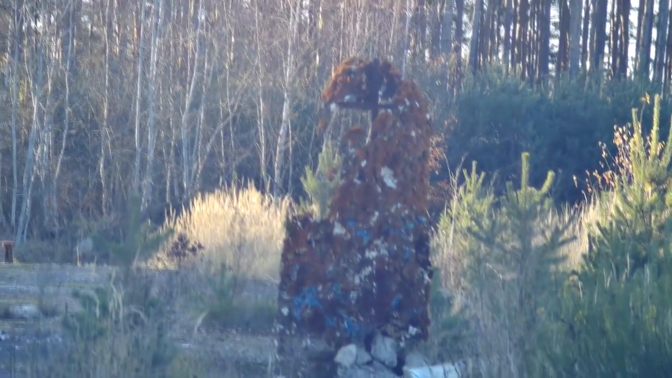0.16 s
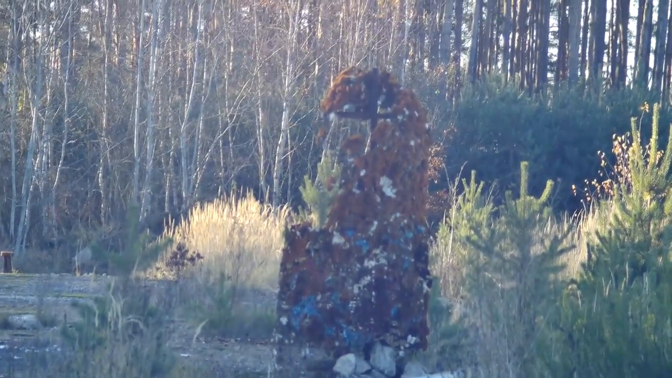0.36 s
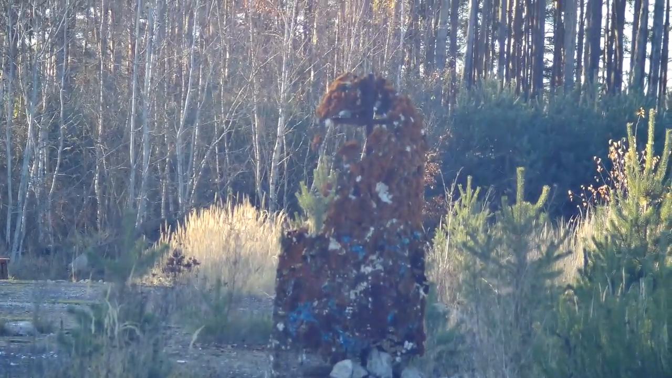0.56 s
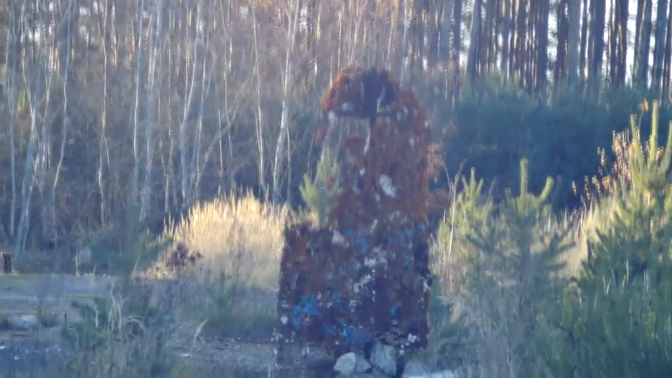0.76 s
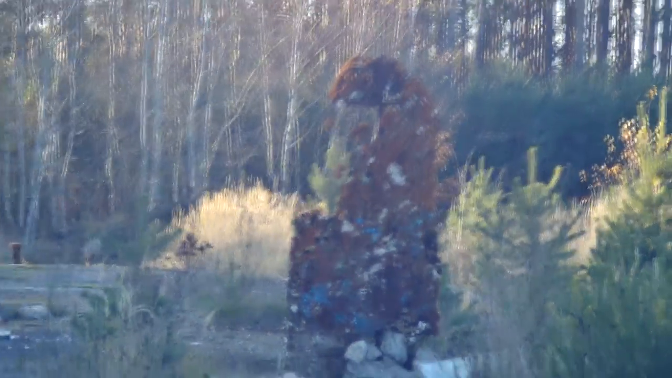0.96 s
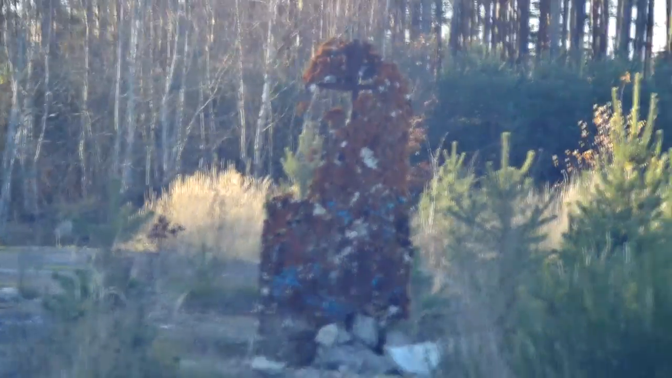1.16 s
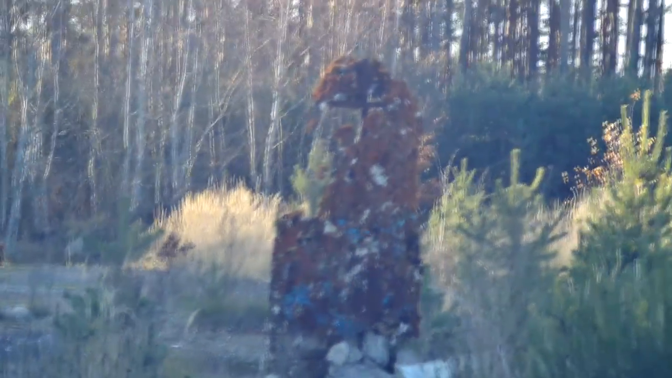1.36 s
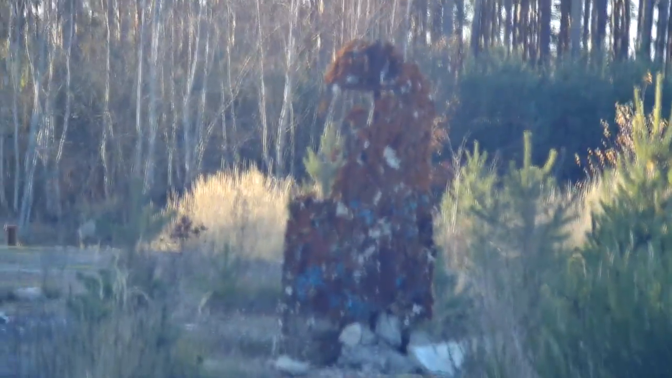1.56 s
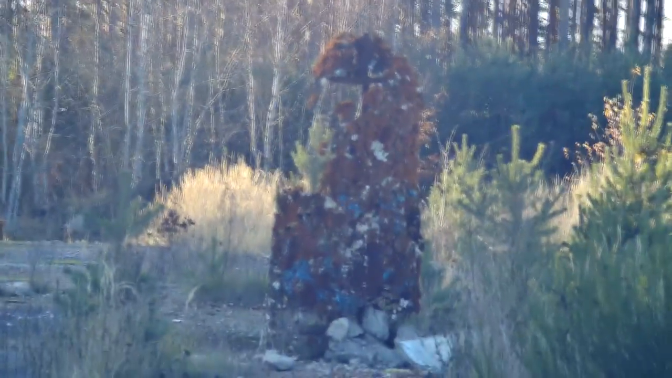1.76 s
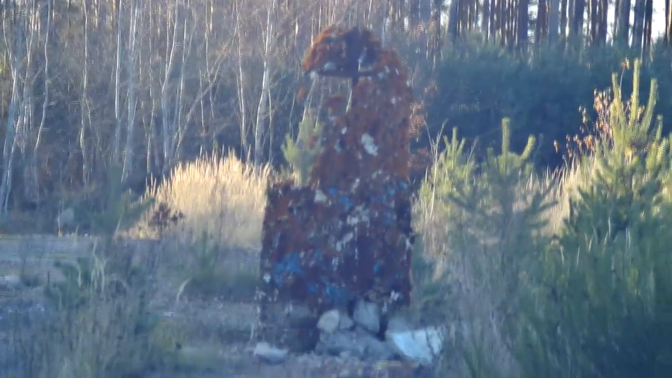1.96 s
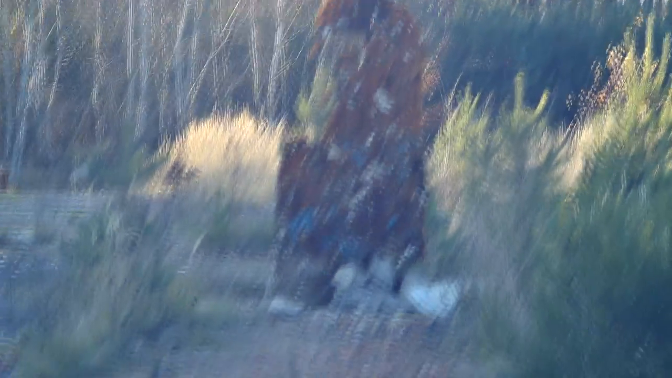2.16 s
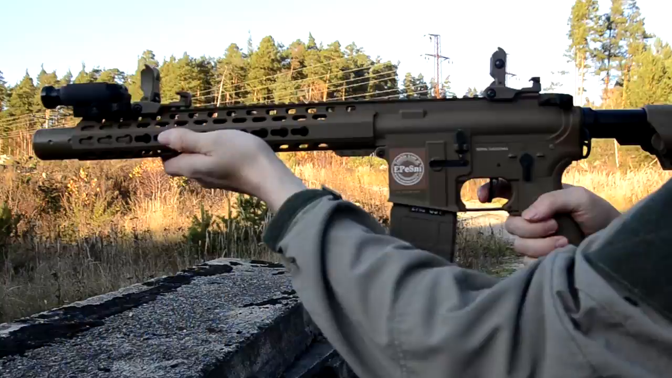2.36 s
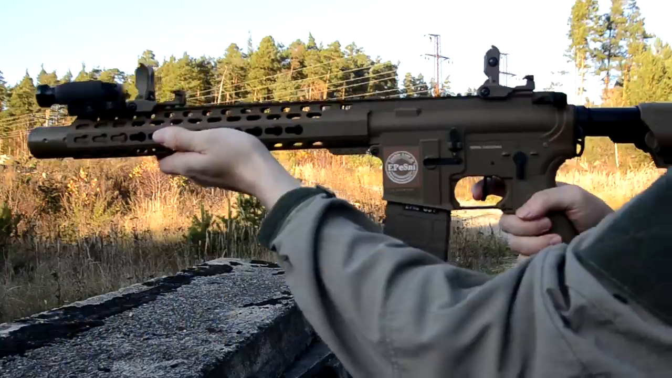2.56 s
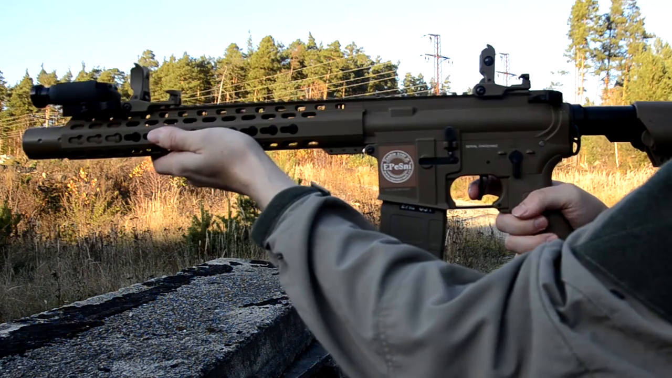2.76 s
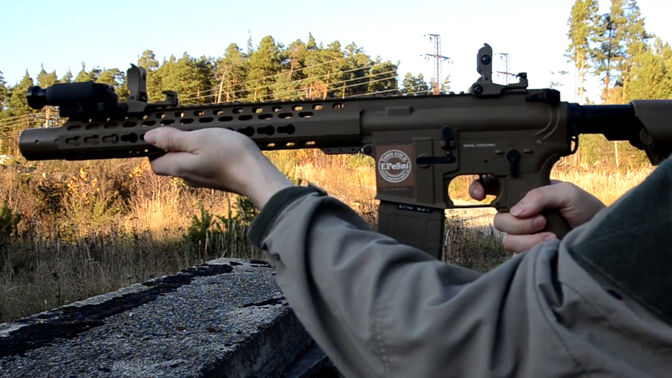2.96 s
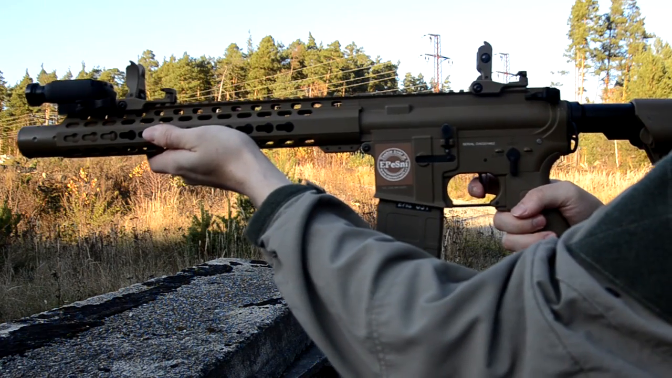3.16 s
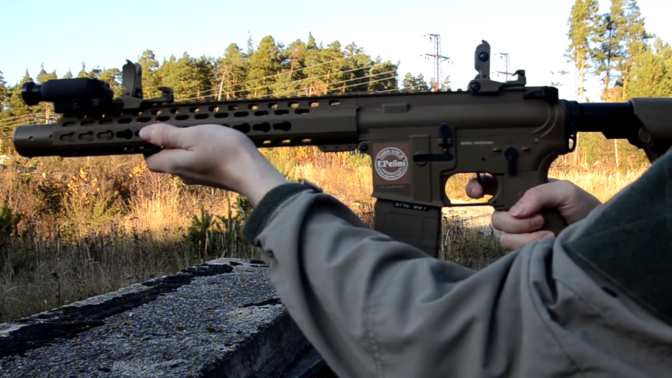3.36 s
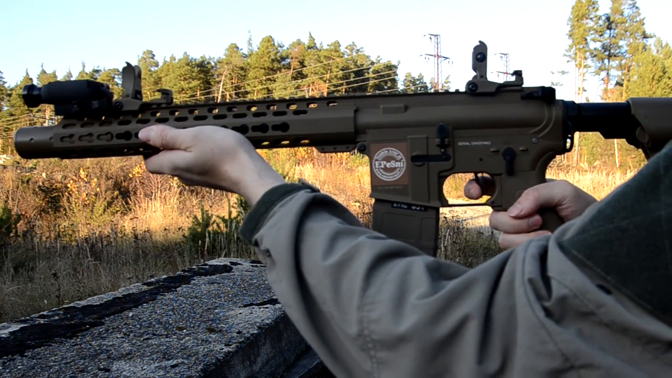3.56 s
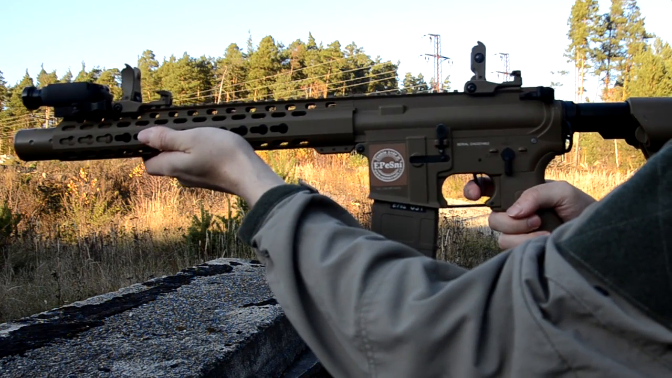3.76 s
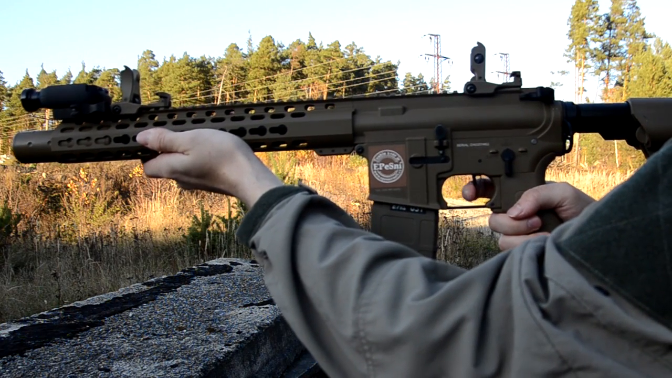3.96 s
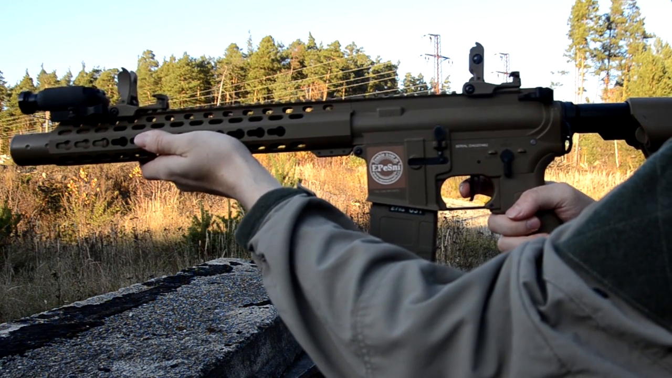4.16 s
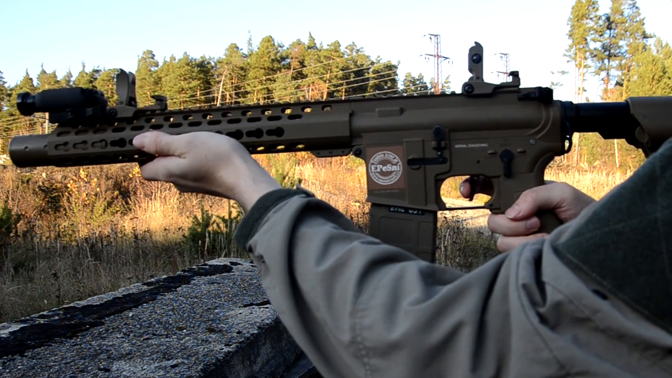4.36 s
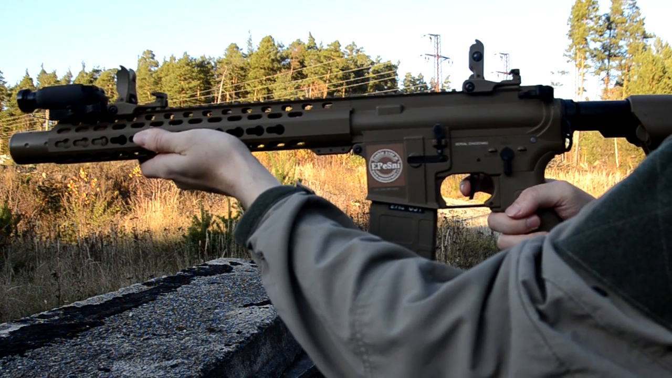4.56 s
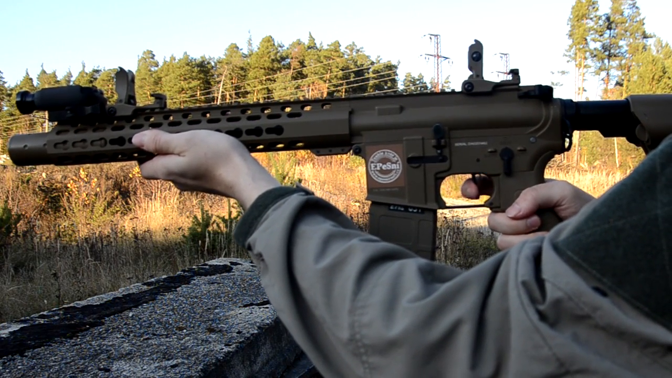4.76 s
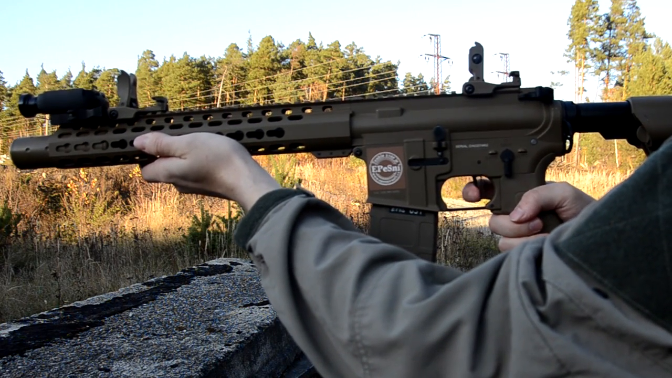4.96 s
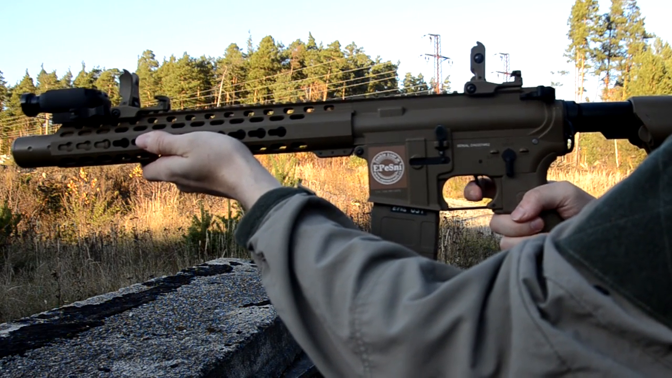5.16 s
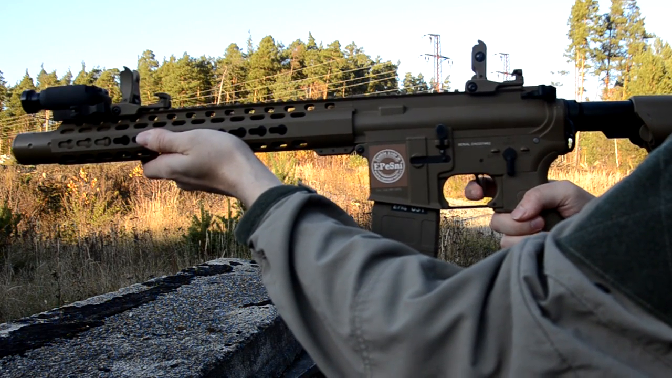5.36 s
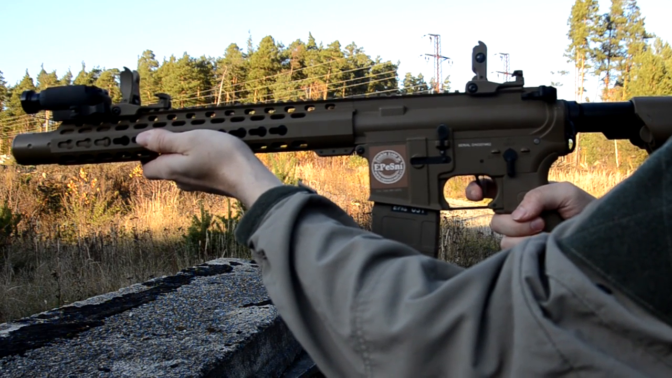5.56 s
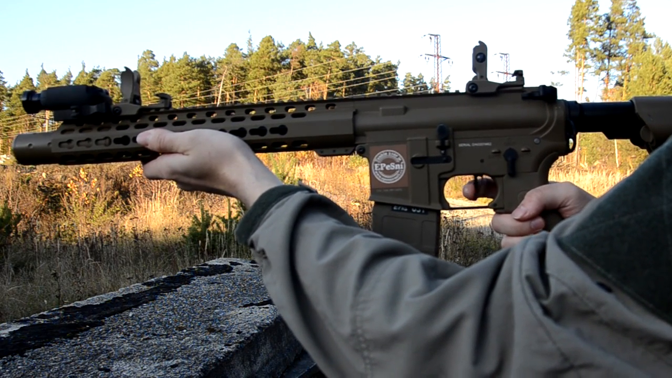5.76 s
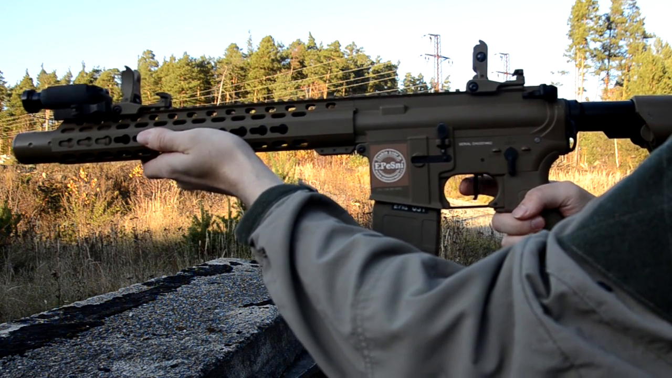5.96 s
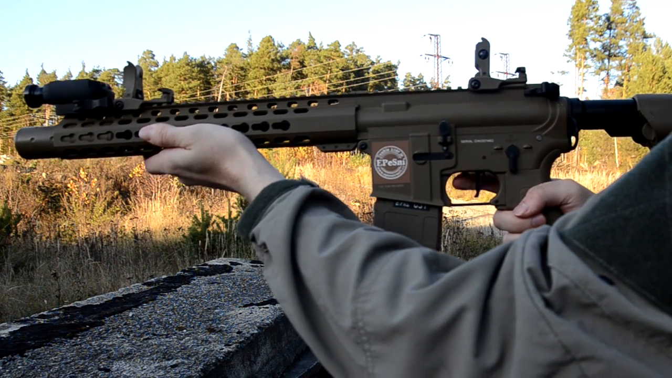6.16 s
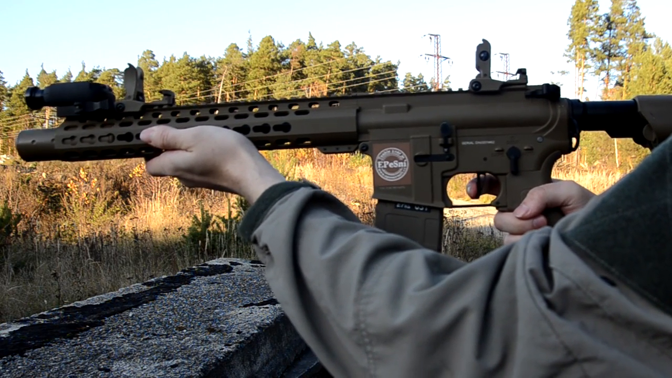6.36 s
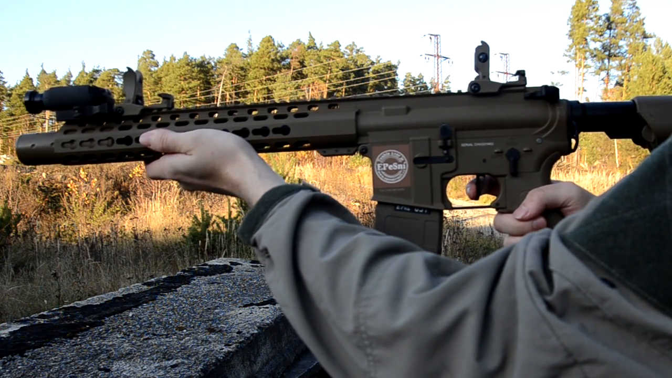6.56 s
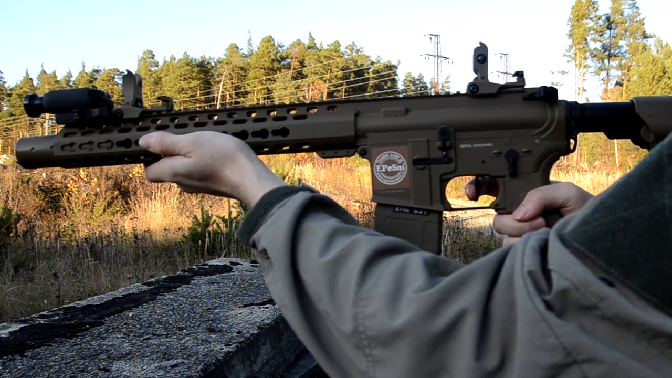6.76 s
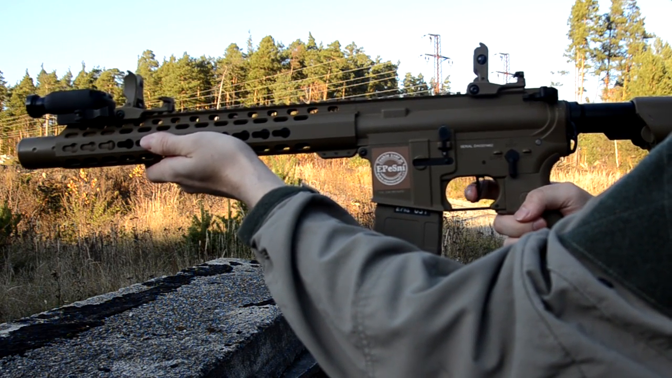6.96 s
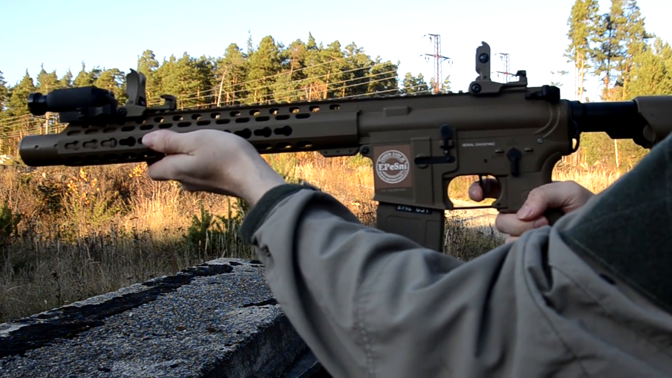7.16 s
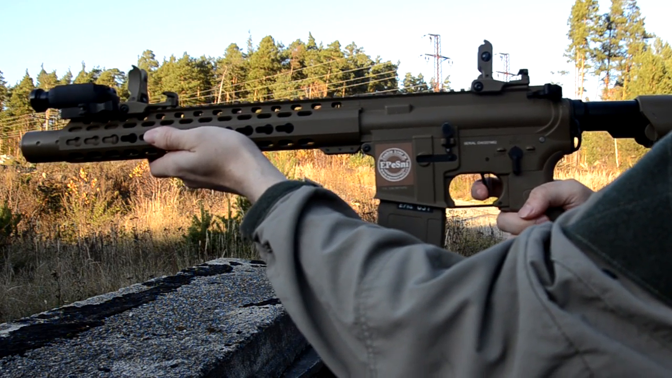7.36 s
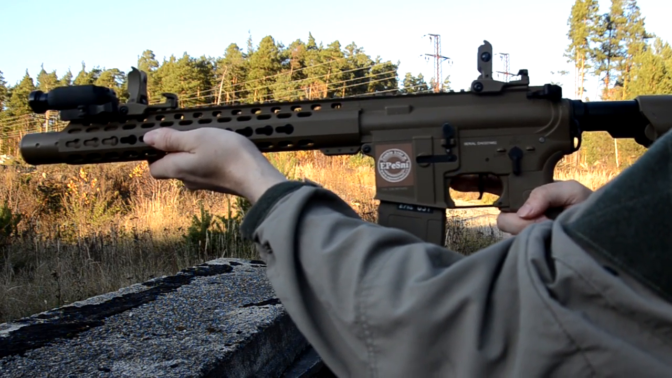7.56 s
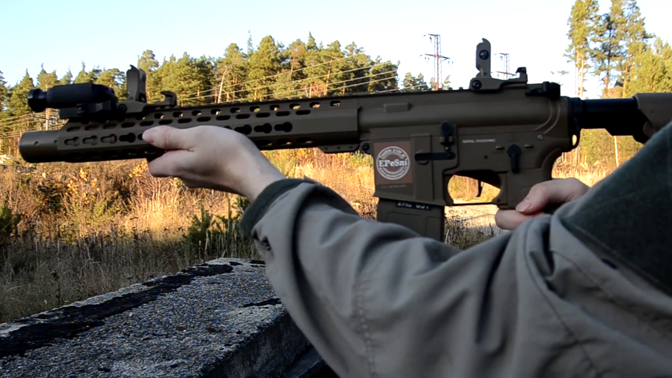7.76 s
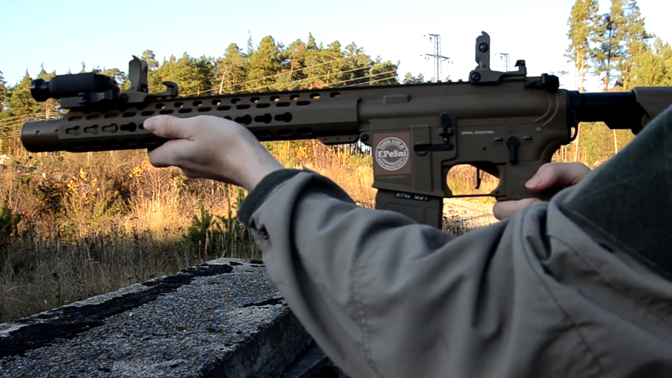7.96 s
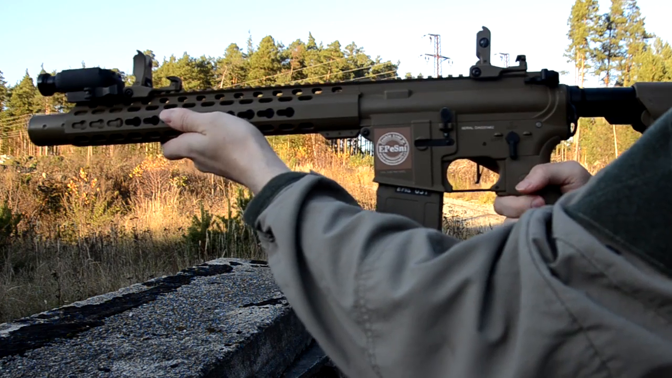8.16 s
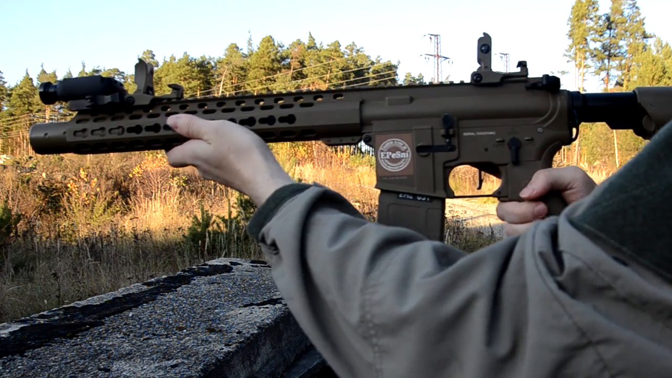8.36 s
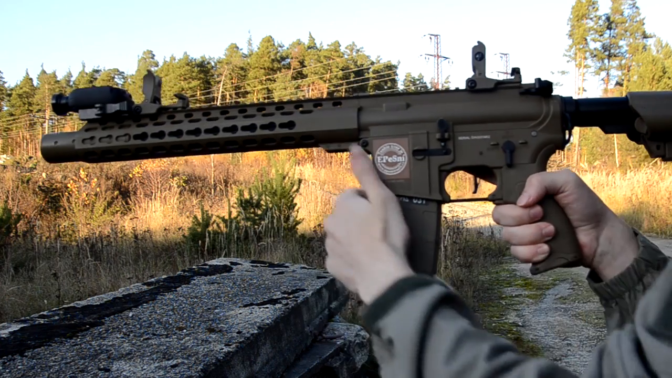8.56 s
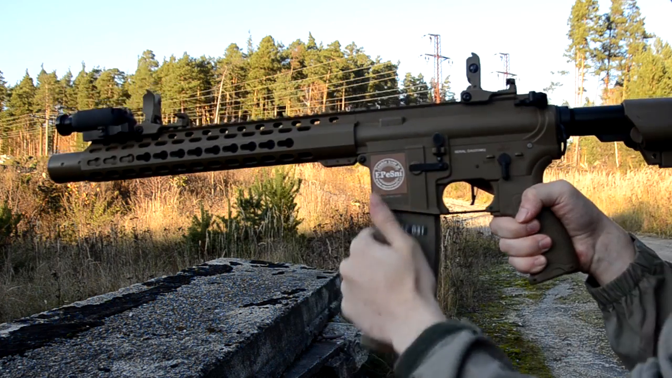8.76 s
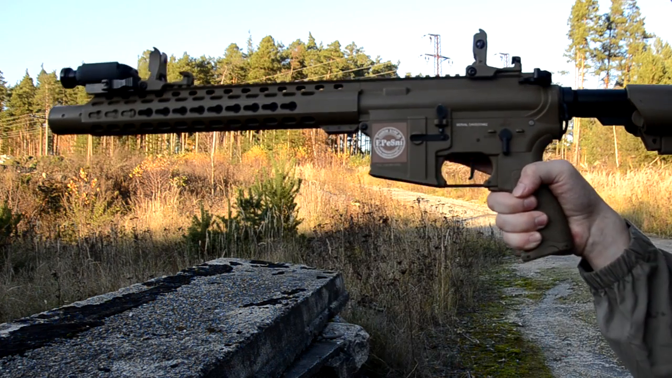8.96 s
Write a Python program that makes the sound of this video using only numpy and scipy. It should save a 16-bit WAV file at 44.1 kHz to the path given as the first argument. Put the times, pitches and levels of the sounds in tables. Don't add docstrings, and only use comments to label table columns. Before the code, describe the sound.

In quiet open air by woods, an electric toy rifle fires a fast burst of about seventeen slams over a raspy motor whine. Small pellets tick on a distant target. The background then changes, and close from the side come single shots in three groups, each a short rising whirr, a hard dry clack and a trigger click. Finally the magazine comes out with clicks and knocks.

```python
import sys
import numpy as np
from scipy import signal
from scipy.fft import rfft, irfft
from scipy.io import wavfile

SR = 44100
rng = np.random.default_rng(int(sys.argv[2]) if len(sys.argv) > 2 else 0)


def master(y):
    cut = np.clip(np.atleast_2d(y).T, -1, 1)
    pcm = np.round(cut * 32767)
    wavfile.write(sys.argv[1], SR, pcm.astype(np.int16))


def voltage_ratio(decibels):
    exponent = np.asarray(decibels, float) / 20
    return 10 ** exponent


N = 397782
TIME = np.arange(N) / SR
SCENE_CHANGE_S = 2.38
AUTO_SLAMS = [0.6594, 0.7316, 0.7967, 0.8618, .927, 0.9923, 1.0577, 1.1231, 1.1885, 1.2541, 1.3196, 1.3853,
              1.4511, 1.5169, 1.5829, 1.6489, 1.7238]


def auto_shots():
    fresh_db, settled_db, settle_s = 4.5, 0.5, 0.2
    return [(s, settled_db + fresh_db * np.exp((AUTO_SLAMS[0] - s) / settle_s)) for s in AUTO_SLAMS]


# (share of cycle, level [dB])
AUTO_CYCLE = [
    (0, -34),
    (.12, -33.5),
    (.24, -33),
    (.3, -28.5),
    (.6, -33.5),
    (0.851, -36),
    (1, -39.5),
]
# (time [s], level [dB])
AUTO_RUN = [(0.601, -77), (0.603, -27), (0.613, -12), (0.648, 2), (.8, -1.5), (1.0, -3.5), (1.679, -2.5),
            (1.731, -4.5), (1.779, -10), (1.83, -17.5), (1.855, -31), (1.9, -57)]
# (share of cycle, speed [rev/s])
AUTO_REVS = [(0, 440), (.3, 505), (.45, 495), (.65, 465), (.88, 410), (1, 440)]
# (time [s], share of full speed)
SPIN_UP = [(.605, .4), (.62, .76), (.635, 1.05), (.648, 1.3), (.67, .96), (.8, 1)]
# (share of cycle, level [dB])
AUTO_LOAD = [(0, -14), (.33, -14), (.5, -2), (.84, -2), (.92, -14), (1, -14)]
ORDERS_BEHIND_DB = [-14, -7, 2, -13, -4, -15, -12, -18, -12]
# (frequency [Hz], width [Hz], level [dB])
SHELL = [(6000, 460, 0.5), (4415, 250, -7.5), (13000, 930, -6)]
# (frequency [Hz], level [dB])
BEHIND = [(120, -51), (200, -20), (702, 0), (1230, -1.5), (1430, -3), (1740, -7), (2650, -11), (2900, -6),
          (3610, -15), (4260, -10), (5200, -15), (5910, -11), (11800, -20.5), (12700, -19), (15500, -52)]


def auto_motor():
    marks = np.array(AUTO_SLAMS)
    marks = np.r_[marks[0] - .068, marks, marks[-1] + .6]
    share = np.interp(TIME, marks, np.arange(len(marks))) % 1
    run_s, run_db = np.transpose(AUTO_RUN)
    cycle_db = np.interp(share, *np.transpose(AUTO_CYCLE))
    level = voltage_ratio(cycle_db + np.interp(TIME, run_s, run_db, -99, -99) + 1.1 * drift(80))
    revs = np.interp(share, *np.transpose(AUTO_REVS)) * np.interp(TIME, *np.transpose(SPIN_UP))
    lines = motor_lines(revs, ORDERS_BEHIND_DB, .008, 2.6)
    load_db = np.interp(share, *np.transpose(AUTO_LOAD))
    load_db = np.where(TIME < AUTO_SLAMS[0] - .01, -3.0, load_db)
    teeth = rasp(2.1)
    shell = sum(voltage_ratio(db) * rms_one(ring(teeth, hz, 5.8 / width)) for hz, width, db in SHELL)
    return level * (colour(teeth, BEHIND) + voltage_ratio(-9.5) * shell + voltage_ratio(load_db) * lines)


# (time from crack [ms], frequency [Hz], t60 [ms], sign, level [dB])
SLAM_BEHIND = [(-9, 600, 7, -1, -21), (-7.7, 310, 9, -1, -14), (-5.2, 103, 37, 1, -15.5),
               (-4.6, 900, 3, -1, -20), (-2.7, 1500, 3, 1, -23), (-.8, 2100, 3, -1, -18),
               (-.1, 1000, 2, -1, -13), (0, 2700, 2.5, -1, -14), (0, 4500, 3, -1, -17),
               (.6, 650, 5, 1, -12), (-.8, 4400, 4.6, 1, -17), (.2, 3200, 5.7, -1, -21),
               (4.5, 330, 25, -1, -32), (4.5, 185, 30, 1, -31), (7.6, 700, 6, -1, -25)]
# (time from crack [ms], frequency [Hz], t60 [ms], sign, level [dB])
SECOND_KNOCK = [(-1, 760, 15, 1, -15.5)]
# (time [s], level [dB])
TRIGGER = (0.67, -1.6)
# (time [s], level [dB], t60 [ms], bass [dB], treble [dB])
AUTO_START = (.604, -19, 45, 5, -8)


def auto_blows():
    shots = auto_shots()
    pickup_ms, pickup_db = 16.6, -10.5
    pickups = [(s + pickup_ms / 1000, db) for s, db in shots[:-1]] + [TRIGGER]
    pickups[0] = (pickups[0][0] + .0052, 7.0)
    pickups[1] = (pickups[1][0], 7.0)
    pickup = slams(pickups, [(-0.2, 820, 9.4, -1, pickup_db - 5.5),
                             (0.11, 2300, 5.0, 1, pickup_db - 17.5),
                             (-0.34, 7800, 3, 1, pickup_db - 15.5)])
    cracks = knocks([(s - .001, db - 9, 14, 0, -1.0) for s, db in shots], BEHIND, 0.85, alike=1.0)
    jerk = knocks([AUTO_START], BEHIND, 1.5)
    blows = filtered(slams(shots, SLAM_BEHIND), 1, 40, "high")
    return blows + pickup + cracks + jerk + slams(shots[1:2], SECOND_KNOCK)


# (slam time [s], wind-up [ms], coast [ms], rack pick-up level [dB])
SINGLE = [(3.0607, 64.5, 113, -13.5), (3.2594, 67, 96, -11.5), (3.4237, 62, 111, -12.5),
          (3.6006, 62, 107, -9.5), (3.7795, 71.3, 118, -16.5), (3.9567, 61.3, 108, -12),
          (4.853, 66.4, 116, -12.5), (5.0444, 65.8, 120, -13), (5.233, 64, 115, -12),
          (5.411, 63, 121, -14.5), (5.5816, 63.6, 118, -16.5), (5.7554, 65, 140, -13),
          (5.9236, 58, 130, -12.5), (6.1113, 64.5, 138, -13), (6.9024, 64, 109, -18.5),
          (7.0894, 63.8, 109, -20), (7.272, 68.7, 119, -18), (7.448, 62, 126, -29)]
PICKUP_MS = 33
# (share of wind-up, gear level [dB])
WIND_UP = [
    (0, -40),
    (.05, -37),
    (.3, -24),
    (.55, -21),
    (.86, -20.5),
    (.91, -17),
    (1, -25.5),
]
# (share of coast, gear level [dB])
COAST = [
    (.02, -35),
    (.27, -40),
    (0.299, -31),
    (.5, -34),
    (.7, -34.5),
    (0.9, -45),
    (1, -45),
]
# (share of wind-up, speed [rev/s])
WIND_REVS = [(0, 250), (.25, 385), (.5, 450), (.72, 472), (.9, 455), (1, 440)]
# (share of coast, speed [rev/s])
COAST_REVS = [(0, 500), (.3, 560), (.6, 540), (1, 300)]
ORDERS_SIDE_DB = [-0.5, -5, -18, -8, -3.5, -9, -15.5, -12.5, -21.5]
# (frequency [Hz], width [Hz], level [dB])
BODY_PEAKS = [(850, 220, -5), (1400, 200, 8.5), (2540, 580, -4.5), (3240, 200, -2), (4450, 540, -11)]
# (frequency [Hz], level [dB])
SIDE_WIND = [(120, -53), (200, -37), (455, -13.5), (832, -1), (1120, -2), (1440, -5), (2080, -7.5),
             (2780, -1.5), (4010, -11.5), (4640, -15.5), (5280, -22.5), (5890, -22.5), (8030, -29),
             (13400, -34), (15800, -35.5)]
# (frequency [Hz], level [dB])
SIDE_COAST = [(120, -59.5), (200, -18), (567, -6), (1100, 1.5), (1580, -3), (1790, -1.5), (2540, -7),
              (3220, -1.5), (4730, -16.5), (8180, -22.5), (9300, -25.5), (13700, -23.5), (15800, -36.5)]


def single_gears():
    loaded, free, singing = np.zeros(N), np.zeros(N), np.ones(N)
    revs, last_s = np.full(N, 200.), 0
    release_ms, release_db = 7, -11.5
    for s, wind_ms, coast_ms, _ in SINGLE:
        slam = round(s * SR)
        wind_db = -3 + 1.5 * (s - last_s > .4)
        coast_db = 0.3 - 0.1215 * (coast_ms - 102.7)
        winding = np.arange(slam - int(wind_ms * SR / 1000), slam)
        coasting = np.arange(slam, slam + int(coast_ms * SR / 1000))
        wound = np.linspace(0, 1, len(winding))
        coasted = np.interp(TIME[:len(coasting)] * 1000, [0, PICKUP_MS, coast_ms], [0, .28, 1])
        free[winding] *= voltage_ratio(-60 * wound)
        free[coasting] = voltage_ratio(coast_db + np.interp(coasted, *np.transpose(COAST)))
        loaded[winding] = voltage_ratio(wind_db + np.interp(wound, *np.transpose(WIND_UP)))
        released = slice(slam - int(release_ms * SR / 1000), slam)
        loaded[released] *= voltage_ratio(release_db / 2)
        singing[released] = voltage_ratio(release_db)
        revs[winding] = np.interp(wound, *np.transpose(WIND_REVS))
        revs[coasting] = np.interp(coasted, *np.transpose(COAST_REVS))
        last_s = s
    teeth = rasp(3.0)
    lines = motor_lines(revs, ORDERS_SIDE_DB, .007, 2.2)
    body = sum(voltage_ratio(db) * peak(lines, hz, width) for hz, width, db in BODY_PEAKS)
    lines = voltage_ratio(-17.0) * lines + body
    winding_sound = loaded * (colour(teeth, SIDE_WIND) + singing * lines)
    coasting_sound = free * (colour(teeth, SIDE_COAST) + voltage_ratio(-28.0) * lines)
    return voltage_ratio(1.2 * drift(120)) * (winding_sound + coasting_sound)


# (time from crack [ms], frequency [Hz], t60 [ms], sign, level [dB])
SLAM_SIDE = [(-7.9, 340, 12, -1, -12), (-4.3, 760, 5, -1, -6), (-2.3, 1000, 4, -1, -18),
             (-2.3, 3000, 4, 1, -11), (-1.1, 330, 5, 1, -14), (-.5, 1900, 3, -1, -11),
             (-.15, 1500, 5, 1, -14), (0, 3400, 2.5, 1, -13), (0, 5200, 2, 1, -18),
             (.1, 11000, 1.5, 1, -24), (1.5, 520, 16, -1, -24), (5.6, 900, 7, -1, -20)]
# (time from crack [ms], frequency [Hz], t60 [ms], sign, level [dB])
SLAM_EMPTY = [
    (-6.6, 800, 3, -1, -10),
    (-5.9, 270, 14, 1, -15.5),
    (-4, 1000, 2.5, -1, -13),
    (-2.1, 620, 9, 1, -8.5),
    (0, 3000, 4, 1, -19),
    (-.25, 1700, 3, 1, -12),
    (3.4, 1900, 2.7, -1, -24.5),
    (3.2, 600, 16, -1, -17),
]
# (time from crack [ms], frequency [Hz], t60 [ms], sign, level [dB])
PUSH_SIDE = [(-5.5, 160, 20.9, 1, -11.5), (6, 550, 90, -1, -35)]
# (time from pick-up [ms], frequency [Hz], t60 [ms], sign, level [dB])
PICKUP_SNAP = [(.5, 937, 7, -1, -6.5), (.7, 3080, 4, 1, -13.5)]


def single_blows():
    early_shot, early_ms, empty_shots = 15, 2.7, 4
    shots = [(row[0] - early_ms / 1000 * (k == early_shot), -1 + 0.25 * k) for k, row in enumerate(SINGLE)]
    cracks = knocks([(s - .0022, db - 7.5, 9, 0, 4.0) for s, db in shots], SIDE_WIND, 0.1, alike=1.0)
    pushes = [(s, db - 28 * (k >= len(SINGLE) - empty_shots)) for k, (s, db) in enumerate(shots)]
    blows = slams(shots[:-empty_shots], SLAM_SIDE) + slams(pushes, PUSH_SIDE)
    blows += slams(shots[-empty_shots:], SLAM_EMPTY)
    blows += slams([(s + PICKUP_MS / 1000, db) for s, *_, db in SINGLE], PICKUP_SNAP)
    return filtered(blows, 3, 88, "high") + cracks


# (time [s], level [dB])
STARTS = [(2.9975, -27), (3.0, -10.5), (3.197, -16.5), (3.545, -16), (3.896, -15.5), (4.789, -10.5),
          (6.837, -31.5), (6.844, -20.5), (6.86, -16), (7.205, -19)]
# (time [s], level [dB])
RESETS = [(3.148, -12.5), (3.342, -15.5), (3.505, -15.5), (3.691, -13.5), (3.86, -31), (4.049, -11.5),
          (5.151, -13.5), (5.331, -11), (5.493, -16.5), (5.669, -12.5), (5.84, -34), (6.007, -16.5),
          (6.206, -9), (7.185, -11), (7.362, -16), (7.539, -13)]
# (time [s], level [dB])
LET_GO = [(3.169, -24.5), (4.071, -27.5), (6.228, -20.5), (7.558, -35)]
# (time [s], level [dB])
TOUCHES = [(2.635, -41), (2.978, -38.5), (4.775, -36.5), (6.822, -38.5)]
# (time [ms], level [dB])
RESET_BOUNCES = [(0, -0.5), (2.8, -6.5), (6.5, -7.5)]
# (t60 [ms], bass [dB], treble [dB])
START_VOICE = (37, -4.5, 0)
PICKUP_VOICE = (24, 0, -2)
RESET_VOICE = (33, 3, 0.1)
LET_GO_VOICE = (52, 7.1, 3)
TOUCH_VOICE = (17, -11, 5.5)
# (frequency [Hz], level [dB])
CLACK = [(120, -22.5), (200, -10), (1100, 4), (1580, 1.5), (2320, -4), (3220, 0), (4810, -20),
         (8330, -26.5), (9470, -36.5), (13700, -39), (15800, -42.5)]


def small_contacts():
    pickups = [(s + PICKUP_MS / 1000, db) for s, *_, db in SINGLE]
    resets = [(s + ms / 1000, db + loss_db) for ms, loss_db in RESET_BOUNCES for s, db in RESETS]
    kinds = [(STARTS, START_VOICE), (pickups, PICKUP_VOICE), (resets, RESET_VOICE),
             (LET_GO, LET_GO_VOICE), (TOUCHES, TOUCH_VOICE)]
    return knocks([(*row, *voice) for rows, voice in kinds for row in rows], CLACK, 1.8)


# (time [s], level [dB], brightness [dB], ring of the part struck [Hz])
MAGAZINE = [(8.6049, -28, 16, 4260), (8.612, -50, 6, 3500), (8.6272, -38, -8, 1500),
            (8.6348, -21, 17, 3080), (8.6371, -35, 14, 3400), (8.6412, -21.5, 22, 3400),
            (8.6463, -32, -6, 1110), (8.65, -26, -4, 1900), (8.764, -45, -10, 1300),
            (8.774, -20.5, -12.5, 1950), (8.7926, -28.5, -14, 2600), (8.799, -33, -11, 1110),
            (8.804, -28, 0, 3000), (8.812, -27, 1, 890), (8.8207, -25, -6, 1400), (8.825, -25.5, -15, 1250),
            (8.837, -33, 9, 2500), (8.936, -32, 15, 4200), (8.9376, -18.5, 31.5, 2090),
            (8.9396, -28, 20, 2090), (8.944, -41, 9, 1090), (8.952, -39, 16, 990)]
# (frequency [Hz], level [dB])
CATCH = [(120, -15), (200, -18), (379, -1.5), (817, -1.5), (1120, 6.5), (1410, 1.5), (1670, -5), (2730, -4),
         (3100, -4.5), (3730, -8), (4810, -19.5), (6000, -24), (6450, -25.5), (15800, -41)]


def magazine():
    bass_share = 0.66
    rows = [(s, db, 35 - 0.4 * (db + 8), -bass_share * bright_db, (1 - bass_share) * bright_db)
            for s, db, bright_db, _ in MAGAZINE]
    out = knocks(rows, CATCH, 1.9)
    edges = [round(row[0] * SR) for row in MAGAZINE] + [N]
    for (*_, hz), start, end in zip(MAGAZINE, edges, edges[1:]):
        struck = np.r_[out[start:end], np.zeros(SR // 20)][:N - start]
        out[start:start + len(struck)] += voltage_ratio(7) * peak(struck, hz, 480)
    return out


# (time [s], level [dB])
PELLETS = [(1.8407, -36), (1.8714, -27.5), (1.935, -38), (2.0018, -32.5), (2.064, -34), (2.1305, -32.5),
           (2.2064, -37)]
# (t60 [ms], bass [dB], treble [dB])
PELLET_VOICE = (36, -2, -1)
# (time [s], level [dB], t60 [ms], bass [dB], treble [dB])
SPRAY = (2.218, -41, 170, -6, -2)
# (frequency [Hz], level [dB])
TARGET = [(180, -15), (300, 5), (738, 0.5), (986, -11), (1790, 1.5), (3140, -5.5), (3570, -12), (4470, -5),
          (14000, -29.5)]


def pellets():
    return knocks([(*hit, *PELLET_VOICE) for hit in PELLETS] + [SPRAY], TARGET, 6.0)


# (time [s], frequency [Hz], level [dB], t60 [s])
RINGS = [(.9, 654, -49, 5.0), (1.724, 210, -27.5, 0.11), (1.721, 630, -67, 2.0), (2.0, 653, -66.5, 4.1),
         (4.05, 1000, -51, 0.67), (4.05, 1976, -51.5, 0.44), (4.05, 2466, -56, 0.3),
         (4.049, 1240, -47, 0.36), (4.05, 1303, -60, .7), (4.15, 1160, -69.5, 2.6), (4.05, 3320, -64, 0.74),
         (4.05, 3095, -66, 1.1), (4.18, 483, -71.5, 3.8), (6.21, 991, -68.5, 1.4), (6.21, 2046, -61.5, 2.8),
         (6.21, 2060, -74.5, 1.5), (6.209, 1920, -62, 0.4), (6.209, 2490, -68, .7),
         (6.209, 1238, -60, 0.78), (6.209, 827, -72.5, .7), (6.209, 3052, -66, 1.8),
         (7.538, 997, -47.5, 0.46), (7.541, 1980, -56, 0.45), (8.04, 2120, -69, 1.44),
         (8.942, 980, -49.5, 0.3), (8.94, 1950, -56, .5)]


def ringing():
    out = np.zeros(N)
    for s, hz, db, t60 in RINGS:
        start = round(s * SR)
        t = TIME[:min(SR, N - start)]
        tone = voltage_ratio(db - 60 * t / t60) * np.sin(2 * np.pi * hz * t)
        out[start:start + len(t)] += tone * (1 - t) ** .3
    return out * voltage_ratio(2.5 * drift(12))


# (time [s], level [dB])
THUDS = [(2.488, -56.5), (2.579, -69), (2.758, -62.5), (2.951, -62), (4.254, -53), (4.538, -56),
         (6.495, -54.5), (7.819, -64), (8.799, -64)]


def thuds():
    return slams(THUDS, [(0, 68.6, 90.3, 1, 1), (0, 140, 59.8, -1, -21)])


def forest(x, t60, start_s):
    t = TIME[:SR]
    wash = rng.standard_normal(SR) * voltage_ratio(-60 * t / t60) * np.clip(t / start_s, 0, 1)
    wash = filtered(wash, 2, [500, 4000], "band")
    return signal.fftconvolve(x, wash / np.sqrt(np.sum(wash ** 2)))[:N]


# (frequency [Hz], level [dB])
AIR_FIRST = [(12, -27.5), (20, 7), (58, -10.5), (98, -17), (203, -16.5), (254, -24.5), (996, -28.5),
             (1430, -34.5), (1690, -29.5), (2880, -27), (3220, -29.5), (8550, -46.5), (15800, -47.5)]
AIR_SECOND = [(12, -46.5), (20, -21), (65, -6), (158, -2.5), (261, -11), (292, -5.5), (345, -10.5),
              (456, -10), (496, -9.5), (1150, -14.5), (2180, -12.5), (7030, -31.5), (15800, -36.5)]
# (frequency [Hz], level [dB])
WHINE = [(1500, -80.5), (8600, -91.5)]
# (time [s], frequency [Hz], level [dB])
BIRD = [
    (2.674, 5030, -95),
    (2.69, 4960, -80),
    (2.76, 4830, -78),
    (2.785, 4850, -95),
]


def air():
    first = voltage_ratio(-60) * colour(rng.standard_normal(N), AIR_FIRST)
    first += sum(voltage_ratio(db) * np.sin(2 * np.pi * hz * TIME) for hz, db in WHINE)
    second = voltage_ratio(-65.5) * colour(rng.standard_normal(N), AIR_SECOND)
    breeze = np.where(TIME < SCENE_CHANGE_S, first, second) * voltage_ratio(.8 * drift(3))
    lumps = rms_one(filtered(rng.standard_normal(N), 2, [40, 220], "band"))
    s, hz, db = np.transpose(BIRD)
    phase = 2 * np.pi * np.cumsum(np.interp(TIME, s, hz)) / SR
    bird = voltage_ratio(np.interp(TIME, s, db, -150, -150)) * np.sin(phase)
    return breeze + voltage_ratio(-79 + 3 * drift(6)) * lumps + bird


def ducking(loud, depth_db, release_s):
    pole = np.exp(-1 / (release_s * SR))
    loudness = signal.lfilter([1 - pole], [1, -pole], np.abs(loud))
    return voltage_ratio(depth_db * np.tanh(loudness / 0.0071))


def rms_one(x):
    return x / np.sqrt(np.mean(x ** 2) + 1e-20)


def filtered(x, order, hz, kind):
    return signal.sosfilt(signal.butter(order, hz, kind, fs=SR, output="sos"), x)


def colour(x, points):
    hz, level = np.transpose(points)
    grid = np.maximum(np.fft.rfftfreq(8192, 1 / SR), 1)
    cepstrum = irfft(np.interp(np.log(grid), np.log(hz), level) * np.log(10) / 20)
    cepstrum[1:4096] *= 2
    cepstrum[4097:] = 0
    response = irfft(np.exp(rfft(cepstrum)))
    return signal.fftconvolve(x, response / np.sqrt(np.sum(response ** 2)))[:N]


def drift(rate):
    knots = rng.standard_normal(int(N / SR * 400) + 2)
    pole = np.exp(-2 * np.pi * rate / 400)
    smooth = rms_one(signal.lfilter([1], [1, -pole], knots))
    return np.interp(TIME * 400, np.arange(len(knots)), smooth)


def ring(clicks, hz, t60):
    r, w = voltage_ratio(-60 / (t60 * SR)), 2 * np.pi * hz / SR
    return signal.lfilter([0, np.sin(w)], [1, -2 * r * np.cos(w), r * r], clicks + 1e-18)


def peak(x, hz, width_hz):
    r = np.exp(-np.pi * width_hz / SR)
    poles = [1, -2 * r * np.cos(2 * np.pi * hz / SR), r * r]
    return signal.lfilter([(1 - r * r) / 2, 0, (r * r - 1) / 2], poles, x + 1e-18)


def rasp(grit):
    size_db = grit * np.minimum(rng.exponential(1, N), 5)
    return rms_one(rng.standard_normal(N) * voltage_ratio(size_db))


ORDERS = [1.2, 2, 3, 4, 6, 7, 9, 10, 12]


def motor_lines(revs, levels_db, wobble, rough_db):
    turn = 2 * np.pi * np.cumsum(revs * (1 + wobble * drift(50))) / SR
    return sum(voltage_ratio(db + rough_db * drift(70)) * np.sin(k * turn) for k, db in zip(ORDERS, levels_db))


def slams(shots, blows):
    out, shots = np.zeros(N), np.array(shots)
    for ms, hz, t60_ms, sign, db in blows:
        clicks = np.zeros(N)
        at = np.round((shots[:, 0] + ms / 1000) * SR).astype(int)
        clicks[at] = voltage_ratio(db + shots[:, 1] + rng.normal(0, 1, len(shots)))
        out += sign * ring(clicks, hz, t60_ms / 1000)
    return out


def knocks(rows, spectrum, snap_db, alike=0):
    layers, t_ms = np.zeros((3, N)), TIME[:4000] * 1000
    rattle = rng.standard_normal((len(rows), 4000))
    rattle = np.sqrt(alike) * rattle[0] + np.sqrt(1 - alike) * rattle
    for (s, db, t60_ms, bass_db, treble_db), noise in zip(rows, rattle):
        i = round(s * SR)
        decay = voltage_ratio(-60 * t_ms / max(t60_ms, 2)) + voltage_ratio(snap_db - 60 * t_ms / 5.6)
        burst = noise * voltage_ratio(db - 15.5) * decay
        layers[:, i:i + 4000] += np.outer(voltage_ratio(np.array([bass_db, 0, treble_db])), burst[:N - i])
    bass = filtered(layers[0], 2, 700, "low")
    middle = filtered(layers[1], 2, [700, 4200], "band")
    treble = filtered(layers[2], 2, 4200, "high")
    return colour(middle - bass - treble, spectrum)


def scene():
    duller = signal.cheby2(8, 30, 15400, fs=SR, output="sos")
    behind = signal.sosfilt(duller, auto_motor() + auto_blows())
    behind += voltage_ratio(-30.0) * forest(behind, 0.074, 0.052) + pellets()
    side = single_gears() + single_blows() + small_contacts() + magazine()
    side += voltage_ratio(-37) * forest(side, 0.85, 0.011)
    background = ducking(side, -2.5, 0.11) * air()
    return (behind * (TIME < SCENE_CHANGE_S) + side + ringing() + thuds() + background)[None]


def top_cut(x):
    return signal.sosfilt(signal.butter(12, 16520, fs=SR, output="sos"), x)


def record(dry):
    rounded = dry / (1 + (dry / .36) ** 4) ** .25
    mix = filtered(rounded, 1, 45, "high")
    mix = signal.sosfilt(signal.cheby2(10, 60, 16700, fs=SR, output="sos"), mix)
    return top_cut(mix)


dry = scene()
out = record(dry)
master(out)
```